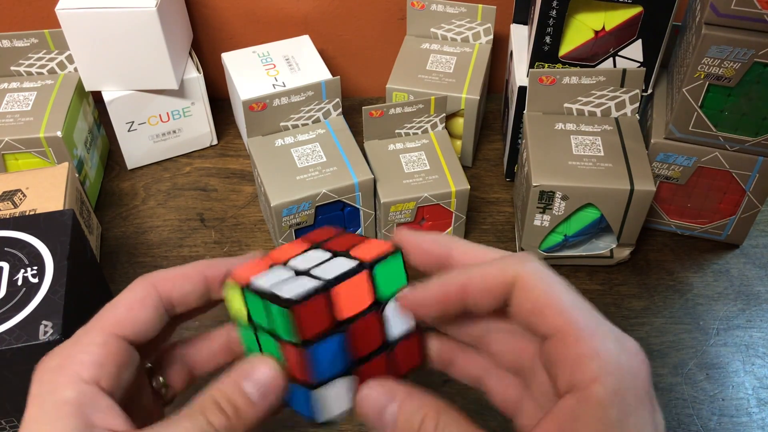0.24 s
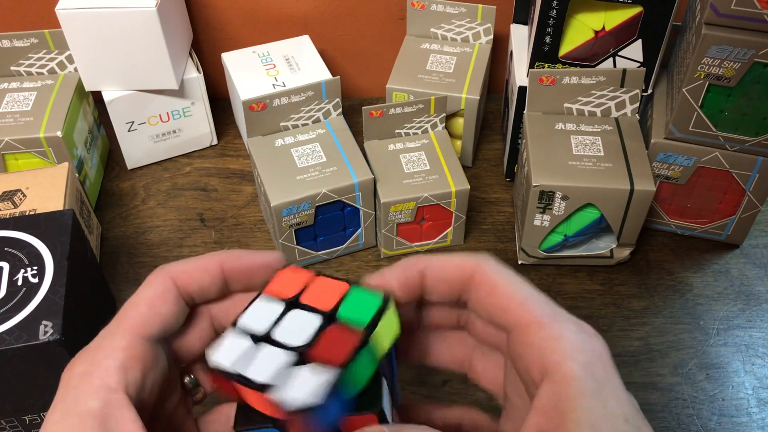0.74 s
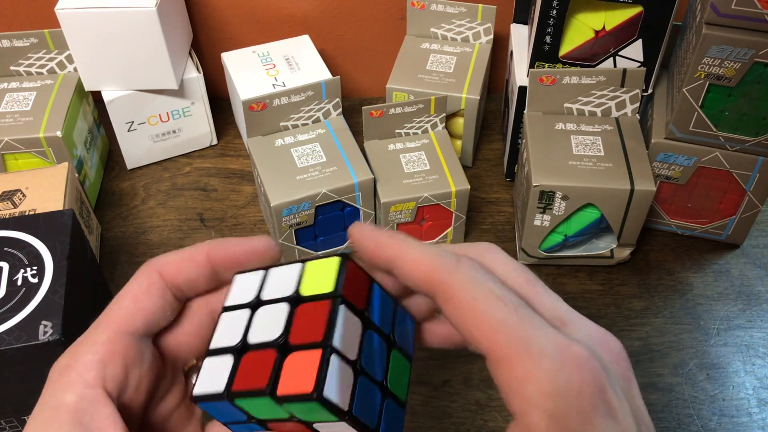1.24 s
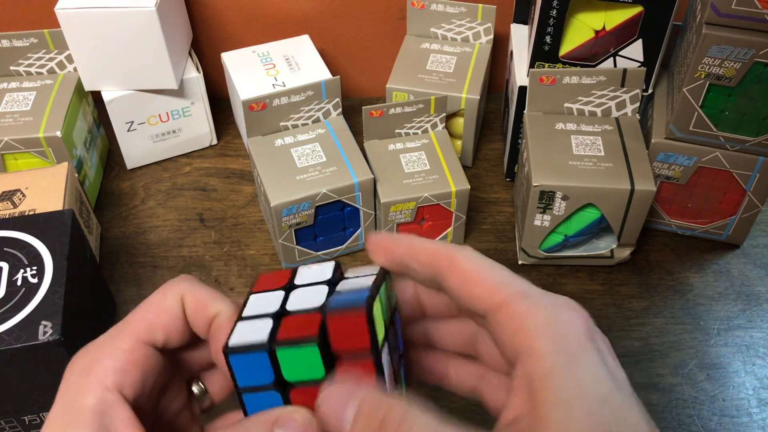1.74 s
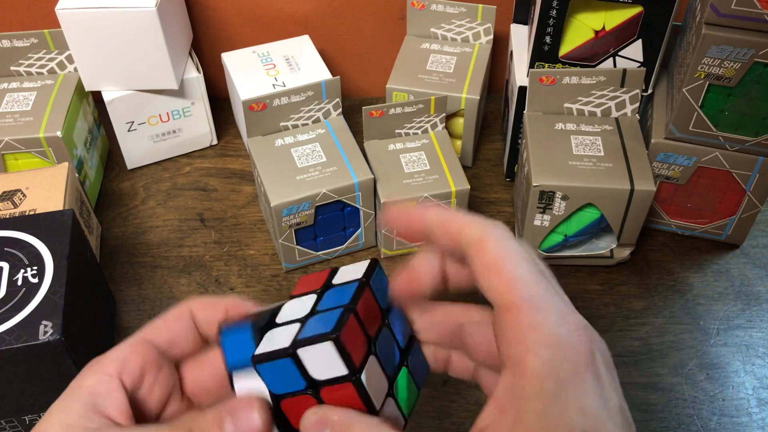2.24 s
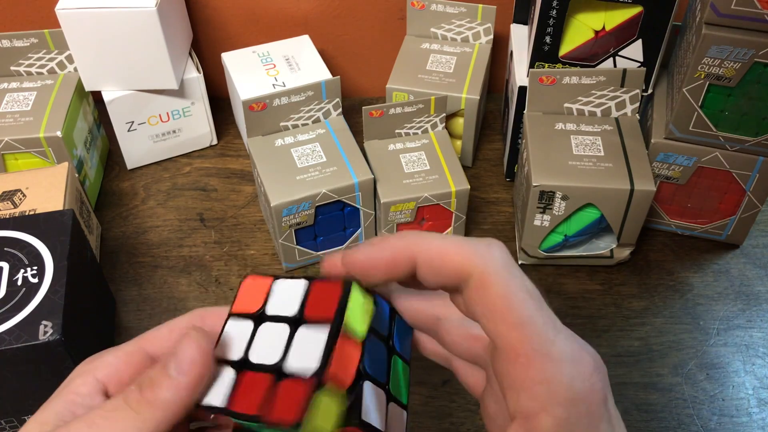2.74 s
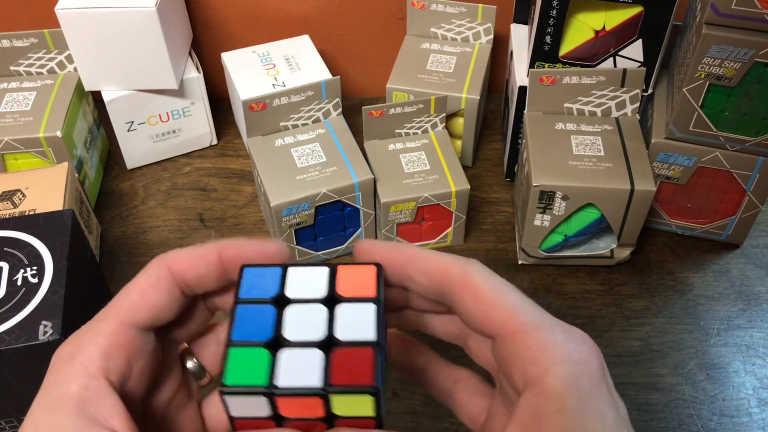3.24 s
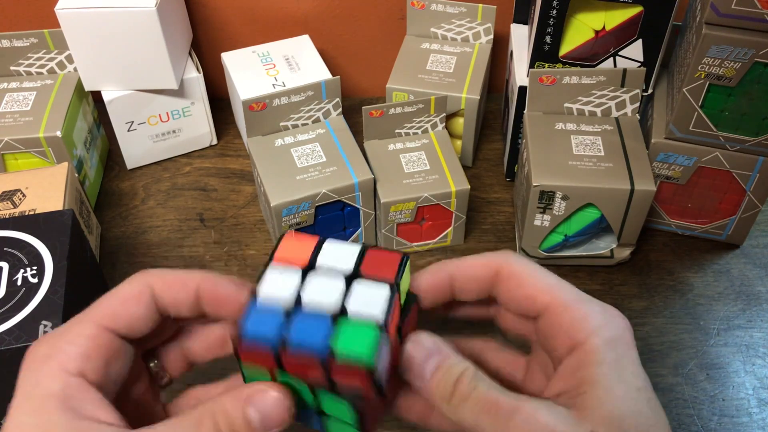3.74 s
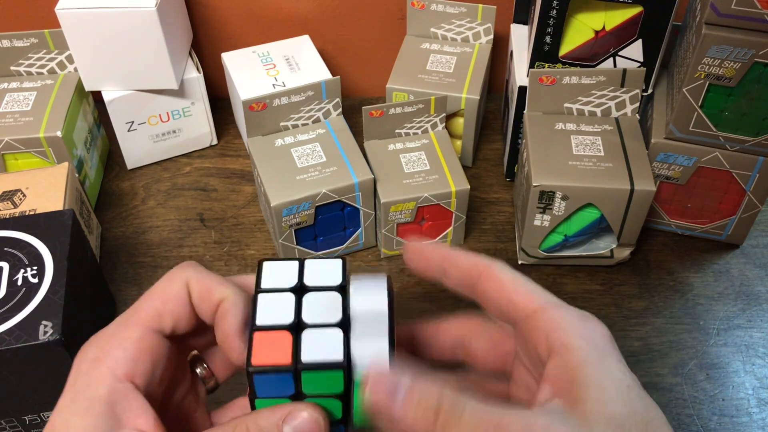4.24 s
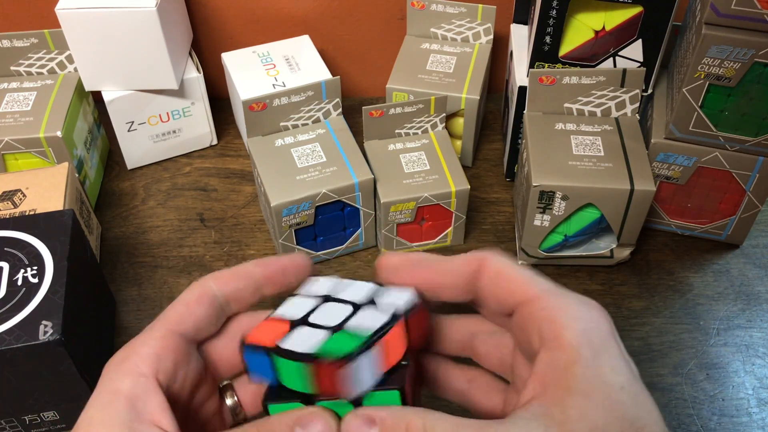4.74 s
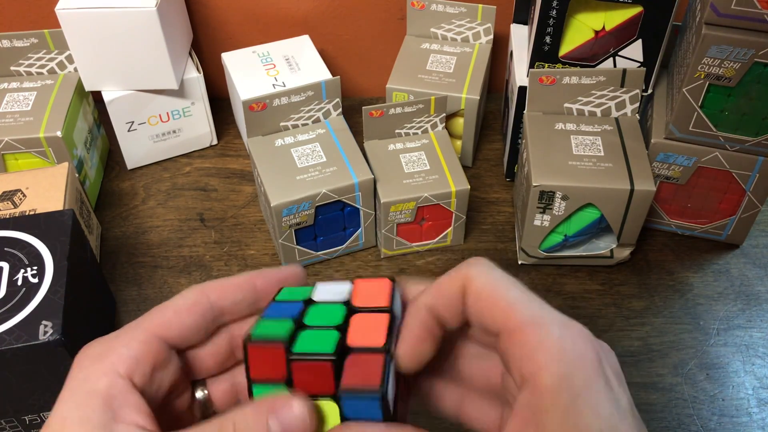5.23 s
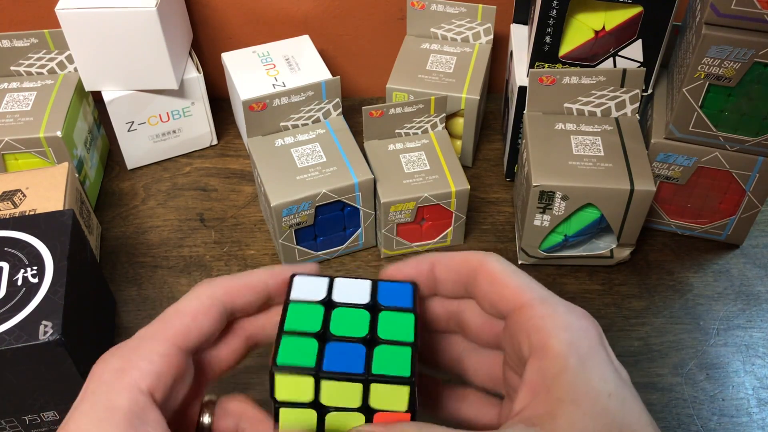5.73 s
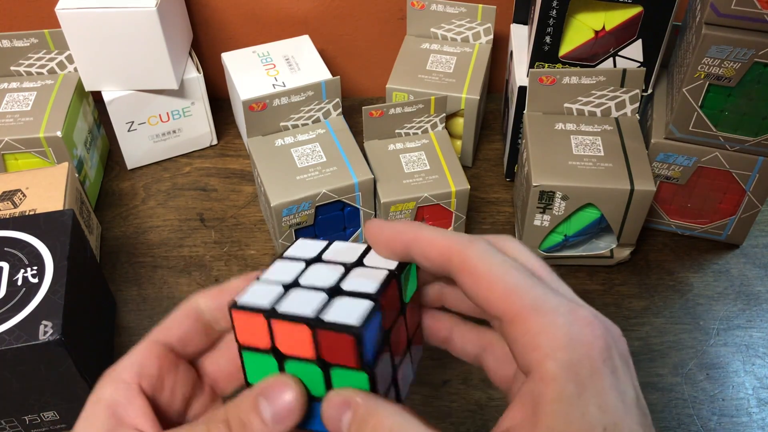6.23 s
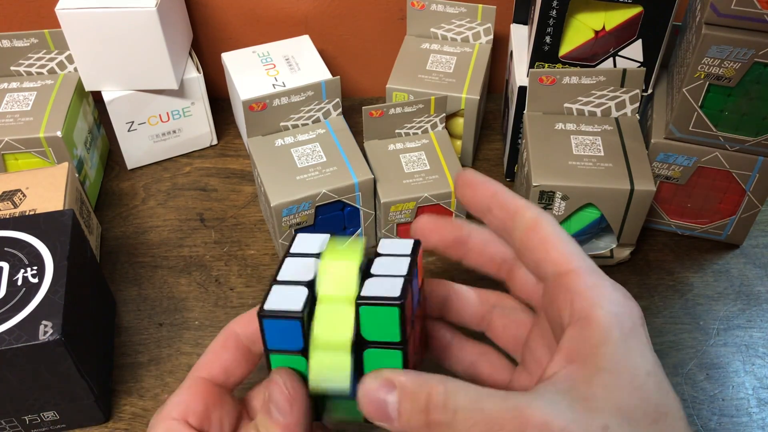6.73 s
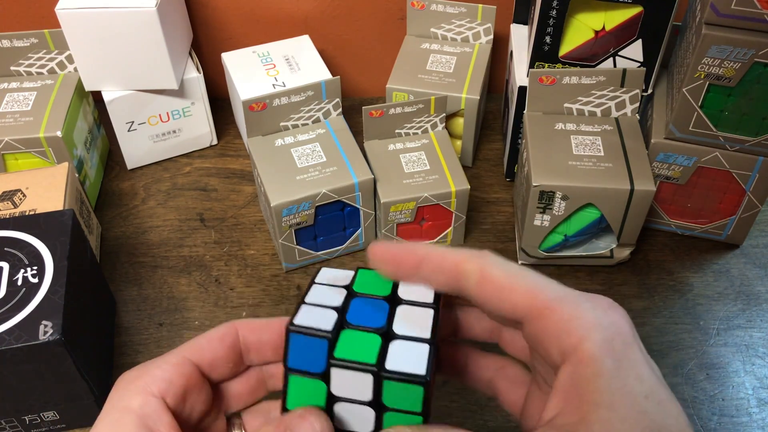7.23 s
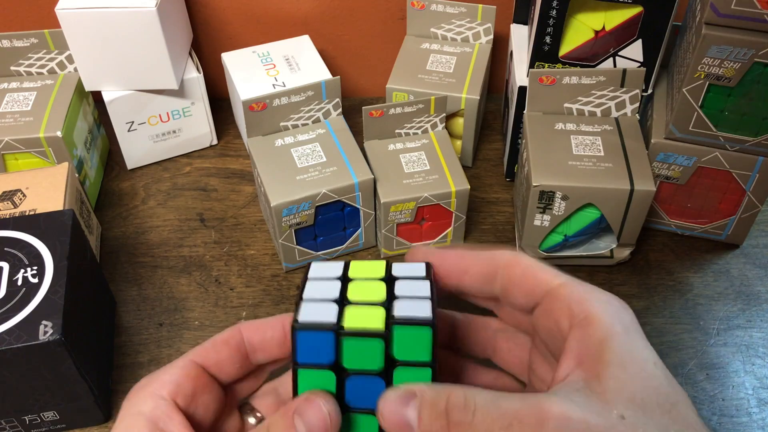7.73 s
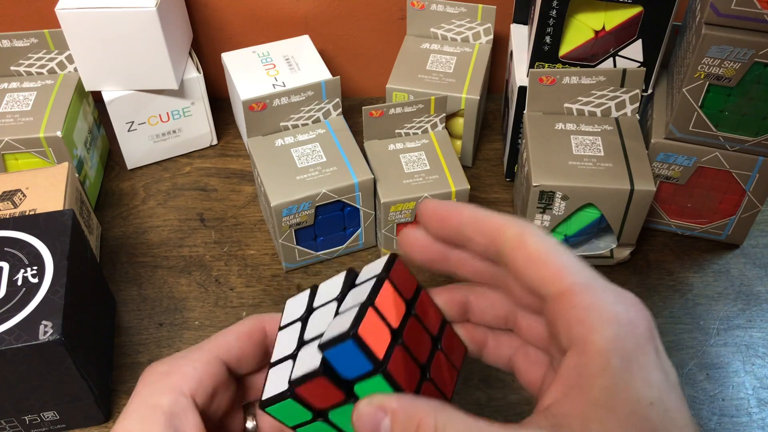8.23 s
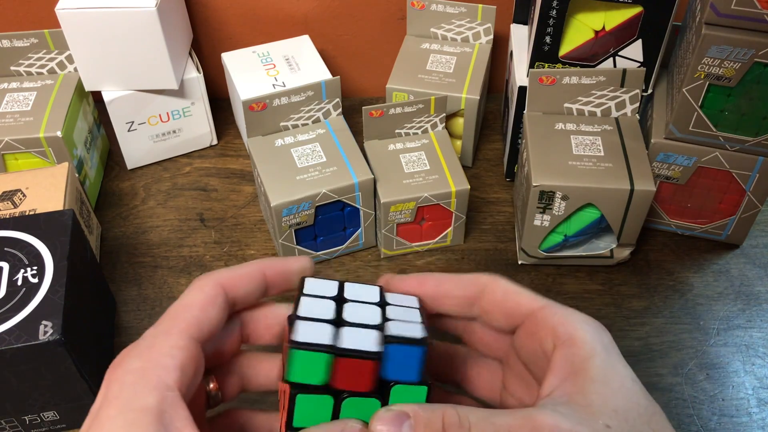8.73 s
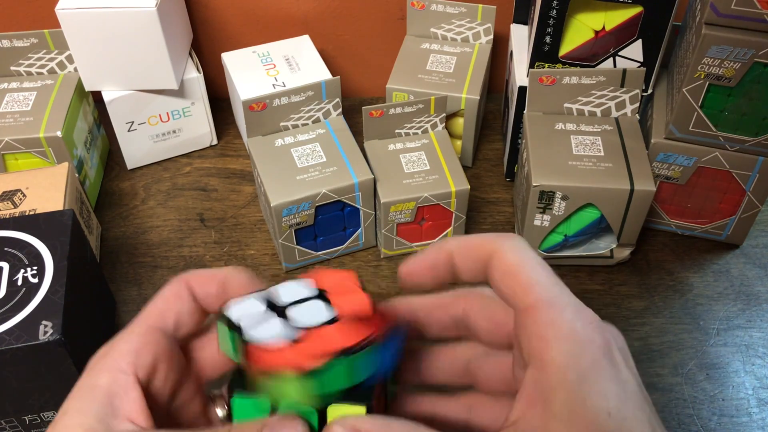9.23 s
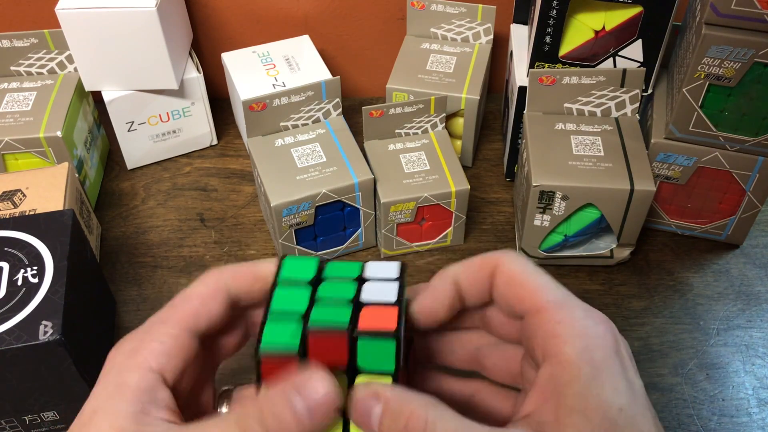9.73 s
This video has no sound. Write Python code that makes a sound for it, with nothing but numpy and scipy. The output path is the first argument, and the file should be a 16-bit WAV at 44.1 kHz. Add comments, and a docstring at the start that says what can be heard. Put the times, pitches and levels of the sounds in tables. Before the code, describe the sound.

Close to the microphone, hands twist a hollow plastic puzzle cube. Layers slide with dry scratchy rattles that end in sharp clacks, grouped in irregular flurries with brief regrips and soft finger brushes between. It starts fairly lightly, thins out in the middle, then grows denser and harder towards the end. A small reflective room adds a short tail, over a faint low hum.

```python
"""In a small, fairly live room, a plastic speed cube is turned in quick flurries above a desk.
Each turn is a run of tiny ticks that slide, rattle and get harder as the pieces mesh; then the fingers regrip.
Pieces land with clacks: a few tiny contacts that crack in the thin shells and knock in the cavities.
Fingertips brush the faces with a fine hiss, and the cube gives dull bumps made of low noise.
The room adds a dense tail of fading noise; under it all lie a low, wavering hum and faint room noise."""
import sys
import numpy as np
from scipy import signal
from scipy.fft import rfft, irfft
from scipy.io import wavfile
from scipy.ndimage import uniform_filter1d

SR = 44100
rng = np.random.default_rng(int(sys.argv[2]) if len(sys.argv) > 2 else 0)


def put_to_file(sound):
    """Save the sound as 16-bit audio at rate SR, in the file named by the first command-line argument."""
    columns = np.atleast_2d(sound).T  # one column per channel
    safe = np.clip(columns, -1, 1)
    whole_steps = np.round(safe * 32767)
    wavfile.write(sys.argv[1], SR, whole_steps.astype(np.int16))


N = 439677  # length in samples


def undb(db):
    """Turn decibels into a gain."""
    return 10 ** (np.asarray(db) / 20)


def unit(x):
    """Scale to an energy of one."""
    return x / np.sqrt(np.sum(x ** 2) + 1e-18)


def level(x, db):
    """Scale to an average (rms) level in dB."""
    return unit(x) * np.sqrt(len(x)) * undb(db)


def add(out, s, x):
    """Mix x into out at time s."""
    i = max(0, int(s * SR))
    out[i:i + len(x)] += x[:max(0, len(out) - i)]


def fade(t, t60):
    """Die away freely, by 60 dB in t60 seconds."""
    return np.exp(-np.log(1000) * t / t60)


def spectrum(points, size):
    """Draw a smooth dB curve through (pitch_hz, level_db) points, over the bins of a transform."""
    hz, db = np.transpose(points)
    return np.interp(np.log(np.fft.rfftfreq(size, 1 / SR) + 1), np.log(hz), db)


def walk(rate):
    """Wander at random with an rms of one, heading for a new value about rate times per second."""
    k = int(SR / rate)
    steps = np.repeat(rng.standard_normal(N // k + 1), k)
    return level(uniform_filter1d(steps, k)[:N], 0)


LEAD_S = 0.005  # pieces graze this long before they snap home


def contacts(edge_db=0, graze=1, chatter_t60=0.032, snap_t60=0.0034, snap_db=-2.0,
             graze_t60=0.013, vary=0.15, crispen=0.4, size=1024):
    """Pieces graze, the main contact snaps, then loose neighbours chatter; an edge snaps more cleanly."""
    t = np.arange(size) / SR - LEAD_S
    before, after = np.maximum(-t, 0), np.maximum(t, 0)
    snap, chatter = rng.standard_normal((2, size))
    touching = rng.random(size) < 0.2  # loose pieces touch only now and then
    slack, force = np.exp(vary * rng.standard_normal(2))
    crisp = undb(crispen * edge_db)
    grazing = fade(before, graze * graze_t60 / crisp)
    settling = fade(after, chatter_t60 * slack / crisp)
    loose = unit(chatter * touching * grazing * settling)
    main = unit(snap * (t >= 0) * fade(after, snap_t60))
    return loose + main * force * crisp * undb(snap_db)


# crack of the thin shells, before it is tilted brighter or duller: pitch_hz [Hz], level_db [dB]
SHELL_CRACK = [(100, -25), (350, -26.5), (800, -16.5), (2000, -7.5), (2800, -4.5), (3900, -1), (5000, 1),
               (7200, -1), (9000, -3), (11000, -6.5), (15000, -14)]


def shell(bright_db, hinge_hz=6800, size=256):
    """A contact cracks in the thin shells; a brighter one lifts the treble and lowers the rest."""
    hz = np.fft.rfftfreq(size, 1 / SR)
    tilt = np.tanh(2.1 * np.log((hz + 1) / hinge_hz))
    db = spectrum(SHELL_CRACK, size) + 0.39 * bright_db * tilt
    # minimum phase: the sound starts at once and rings afterwards
    cepstrum = irfft(np.log(undb(db)))
    cepstrum[1:size // 2] *= 2
    cepstrum[size // 2 + 1:] = 0
    return irfft(np.exp(rfft(cepstrum)))


# ringing air and walls of the hollow pieces, before random spread:
# pitch_hz [Hz], t60_s (time to fade by 60 dB) [s], level_db [dB]
HOLLOW_RINGS = [(1248, 0.046, -3), (1324, 0.027, 2.5), (1437, 0.021, -3.5), (1595, 0.047, -2.5),
                (1825, 0.0092, -2), (2100, 0.018, -4.5), (353, 0.031, -16.5), (560, 0.024, -16.5)]
# moments when a firm grip raises the pitch of the cavities: peak_s [s], rise_semitones [semitones]
GRIP_SQUEEZES = [(1.79, 1.35), (2.46, 0.6), (7.011, 4.06), (9.3, 1.15)]
SQUEEZE_S = 0.074  # the rise falls to about a third this long before and after its peak


def hollow(s, force_db, scatter_db=2.5, detune=0.035, stiffen=0.21, build_s=0.00027, size=2048):
    """Hollow pieces knock at time s; the grip shifts their pitch, and hard blows favour the upper rings."""
    hz, t60, db = np.transpose(HOLLOW_RINGS)[:, :, None]
    t = np.arange(size) / SR
    shift, weight, side = rng.standard_normal((3, len(HOLLOW_RINGS), 1))
    upper = np.clip(np.log2(hz / 1450) * 4, -1, 1)
    gain = undb(db + scatter_db * weight + stiffen * force_db * upper) * np.sign(side)
    semitones = sum(rise * np.exp(-((s - peak) / SQUEEZE_S) ** 2) for peak, rise in GRIP_SQUEEZES)
    pitch_hz = hz * 2 ** (semitones / 12) * (1 + detune * shift)
    ring = np.sum(gain * fade(t, t60) * np.sin(2 * np.pi * pitch_hz * t), axis=0)
    return ring * (1 - np.exp(-t / build_s))


KNOCK_DB = -9.5  # knock of a blow with edge_db 0, against its crack
RESTING_GRAZE = 0.2  # share of the graze time that is left when no layer is moving
# pieces striking each other: start_s [s], crack_db (averaged over about 1 ms) [dB],
# edge_db (above 0 a sharp edge ticks, below 0 a flat face knocks) [dB]
LANDINGS = [(0.036, -38, 4), (0.1826, -24.5, -5.5), (0.332, -39.5, 10), (0.545, -37.5, 0),
            (0.6913, -30, -13), (0.748, -29, -7), (0.7965, -25.5, -2), (0.827, -19.5, -0.5),
            (1.433, -43, 10), (1.451, -28.5, -3), (1.4987, -21.5, -5.5), (1.5809, -7, 9), (1.657, -20.5, 2),
            (1.6654, -18.5, -1.5), (1.7535, -18.5, -4), (1.776, -23, -11), (1.9306, -37.5, 7),
            (2.0142, -28.5, -3), (2.0693, -11.5, 23), (2.0731, -16.5, -5.5), (2.0886, -11.5, 1),
            (2.103, -18, 4), (2.1703, -19, -0.5), (2.254, -17.5, -5.5), (2.282, -21, -7.5),
            (2.4175, -23, -1), (2.4471, -20.5, 3), (2.5128, -16.5, -4), (2.8093, -30, -7), (2.866, -36, -5),
            (3.0122, -34, -11.5), (3.0328, -24.5, -5.5), (3.381, -29.5, -5), (3.4113, -20.5, -9),
            (3.557, -31, -7), (3.6656, -23.5, -2), (3.6959, -23.5, -3.5), (3.8385, -24.5, -8.5),
            (3.941, -38, -5), (4.059, -27, -10), (4.0897, -24.5, -9), (4.225, -31, -7), (4.28, -24.5, -6),
            (4.309, -17.5, -2), (4.3237, -30, 2), (4.5206, -38.5, -3), (4.587, -38, 13),
            (4.8006, -24.5, -2), (4.8363, -18, 2.5), (4.8519, -28.5, -7), (4.923, -30.5, -5.5),
            (4.941, -37, 7), (5.145, -25, -2), (5.215, -29, -2), (5.2596, -10.5, 1), (5.2794, -12.5, -1),
            (5.347, -18.5, -1.5), (5.4218, -27.5, -2), (5.4662, -17, 7), (5.4739, -14.5, -5),
            (5.6672, -17.5, -4.5), (5.821, -22.5, -6.5), (5.8483, -11, 5), (5.881, -17.5, 5),
            (5.9939, -8.5, 8), (5.9983, -10.5, -3), (6.0473, -19, 6), (6.174, -34, 0), (6.259, -42, -8),
            (6.2943, -41.5, 23), (6.469, -44, 2), (6.534, -24.5, -10), (6.5549, -16.5, 0),
            (6.679, -24, -6.5), (6.712, -18.5, -3.5), (6.772, -17.5, 8), (6.7969, -11, 0),
            (6.8903, -18.5, 15), (6.9574, -25.5, -11.5), (6.9804, -16, 4), (7.0175, -16.5, 5),
            (7.032, -16, 1), (7.052, -21, 14), (7.073, -12.5, 25), (7.1951, -27, -4.5), (7.2617, -27.5, 0),
            (7.5059, -26, -8), (7.5442, -6, 0.5), (7.557, -11.5, 6), (7.706, -32, 7), (7.8148, -17, 7),
            (7.8341, -11, 5), (7.8495, -19, -7), (7.9004, -10.5, 7.5), (7.9644, -13, 1), (7.976, -15.5, 2),
            (8.0277, -10.5, 3), (8.034, -10.5, 1), (8.0425, -10, 1), (8.16, -29, -1), (8.3916, -27, -4),
            (8.5324, -35.5, -6), (8.8507, -17, -1), (9.0708, -20, -3), (9.1178, -17.5, -6),
            (9.1345, -17.5, -5), (9.1544, -18, -8), (9.2797, -10.5, 6), (9.2978, -8, 11),
            (9.3015, -0.5, 3.5), (9.3793, -9, 2), (9.4917, -26, -12.5), (9.5283, -17.5, -3.5),
            (9.6901, -21, -3), (9.777, -14, 6.5), (9.9002, -34, -3), (9.9606, -33.5, -4)]


def clacks(firm_db=-25, colour_db=7.0):
    """Each landing cracks in the shells and knocks in the cavities; an edge is brighter and knocks less."""
    out = np.zeros(N)
    for s, db, edge_db in LANDINGS:
        bright_db = edge_db + colour_db * rng.standard_normal()
        knock_db = db + KNOCK_DB - edge_db
        moving = any(start + LEAD_S < s < end + LEAD_S for start, end, *_ in LAYER_TURNS)
        touch = contacts(edge_db, 1 if moving else RESTING_GRAZE)
        crack = signal.fftconvolve(touch, shell(bright_db))
        knock = hollow(s, knock_db - firm_db)
        add(out, s - LEAD_S, unit(crack) * undb(db))
        add(out, s, unit(knock) * undb(knock_db))
    return out * np.sqrt(SR // 1000)  # energy of one spread over about 1 ms


MESH_S = 0.0097  # how sharply the mesh sets in: a third of its rise this long before the end
BITE_S = 0.0028  # the first push only rattles; the scrape bites as the layer gathers speed


def sliding(start, end, db, rate, mesh_db, bright_db, spread_db=6.5, scrape_db=-2.5, rattle_db=-6.0,
            firm_db=-36, harden=0.37, count=4, size=256):
    """A layer catches and slips in tiny ticks; light strokes rattle the cavities, hard ones scrape."""
    length = end - start
    when, hardness, side = rng.random((size, 3))[:count + int(rate * length)].T
    times = length * when
    effort_db = mesh_db * np.exp((times - length) / MESH_S)
    chance_db = spread_db * np.minimum(-np.log(1 - hardness), 3)
    strength = undb(chance_db + effort_db) * np.sign(side - 0.5)
    # several pieces share the ticks, each with its own chatter
    ticks = np.zeros((count, int(length * SR) + 1))
    ticks[np.arange(len(times)) % count, (times * SR).astype(int)] = strength
    touches = sum(signal.fftconvolve(piece, contacts()) for piece in ticks)
    scrape = signal.fftconvolve(touches, shell(bright_db))[int(LEAD_S * SR):]
    scrape = scrape * (1 - np.exp(-np.arange(len(scrape)) / SR / BITE_S))
    middle = (start + end) / 2
    rattle = sum(signal.fftconvolve(piece, hollow(middle, db - firm_db)) for piece in ticks)
    out = undb(rattle_db - harden * max(db - firm_db, 0)) * unit(rattle)
    add(out, 0, undb(scrape_db) * unit(scrape))
    return out * undb(db) * np.sqrt(length * SR)


SLIDE_RATE = 430  # ticks per s while a layer turns, plus a few
MESH_DB = 11  # the ticks get this much stronger by the end of a turn
REGRIP_S = (0.087, 0.35)  # the regrip starts and ends this long after the turn
REGRIP_DB, REGRIP_MAX_DB = -24.5, -61  # regrip setting: dB against the turn, and its highest value
REGRIP_RATE, REGRIP_BRIGHT_DB = 160, 9.0  # light ticks per s, plus a few, and their brightness setting
# turns of a layer: start_s [s], end_s [s], level_db (before the scrape and rattle shares) [dB],
# brightness_db (setting for the shell's tilt) [dB]
LAYER_TURNS = [(0.113, 0.185, -36.5, -1), (0.492, 0.6, -62.5, -0.5), (0.65, 0.831, -41.5, 4),
               (0.874, 0.991, -44.5, 7), (1.453, 1.584, -38, -4), (1.599, 1.785, -40, 9),
               (1.899, 1.999, -48, -1), (2.011, 2.107, -37.5, -1), (2.124, 2.198, -41, 5),
               (2.249, 2.332, -42, 3), (2.432, 2.469, -27.5, 7), (2.592, 2.699, -48.5, -22),
               (2.796, 2.898, -46, -14), (2.954, 3.04, -45.5, 15), (3.348, 3.42, -46, 10),
               (3.642, 3.7, -41, -6), (3.997, 4.103, -43.5, 5), (4.109, 4.324, -46.5, 14),
               (4.777, 4.858, -39, 3), (5.098, 5.269, -36.5, 2), (5.46, 5.482, -16, 10),
               (5.618, 5.669, -40.5, 5), (5.85, 6.003, -34.5, 2), (6.503, 6.559, -36.5, 14),
               (6.682, 6.81, -33.5, 5), (6.839, 7.076, -39, 2), (7.492, 7.558, -32, 8),
               (7.791, 7.907, -37.5, 20), (7.944, 8.042, -28.5, 1), (8.776, 8.864, -42, 5),
               (9.115, 9.17, -30.5, 8), (9.21, 9.306, -27, 2.5), (9.499, 9.649, -35.5, -3),
               (9.677, 9.783, -31, 5)]


def turns():
    """Each turn slides until its pieces mesh; then loose layers stir faintly as the fingers regrip."""
    out = np.zeros(N)
    for start, end, db, bright_db in LAYER_TURNS:
        add(out, start, sliding(start, end, db, SLIDE_RATE, MESH_DB, bright_db))
        release, grip = end + np.array(REGRIP_S)
        regrip_db = min(db + REGRIP_DB, REGRIP_MAX_DB)
        add(out, release, sliding(release, grip, regrip_db, REGRIP_RATE, 0, REGRIP_BRIGHT_DB))
    return out


# tone of skin on smooth plastic, shape only: pitch_hz [Hz], level_db [dB]
SKIN_TONE = [(300, -33), (2000, -6), (6000, -6), (9500, 1), (12000, -4), (15500, -8)]
# fingertips brushing over the faces: start_s [s], end_s [s], level_db (mid-stroke, before the catches) [dB]
FINGER_BRUSHES = [(0.962, 1.055, -49), (1.848, 2.006, -60), (2.577, 2.734, -49.5), (2.79, 2.94, -47.5),
                  (2.943, 2.98, -46.5), (3.413, 3.474, -47), (3.88, 4.014, -60), (4.055, 4.23, -47),
                  (8.197, 8.29, -52.5), (7.33, 7.405, -64)]


def brushes(catch_db=3.0, catch_rate=150):
    """Skin brushes a face: a fine hiss that swells, catches unevenly and fades."""
    strokes = np.zeros(N)
    noise = irfft(rfft(rng.standard_normal(N)) * undb(spectrum(SKIN_TONE, N)), N)
    hiss = level(noise, 0) * undb(catch_db * walk(catch_rate))
    for start, end, db in FINGER_BRUSHES:
        swell = np.sin(np.linspace(0, np.pi, int((end - start) * SR)))
        add(strokes, start, undb(db) * swell)
    return strokes * hiss


# dull bumps of the cube in the hands: start_s [s], level_db (before it fades) [dB],
# t60_s (time to fade by 60 dB) [s], top_hz (upper edge of the rumble) [Hz]
HAND_BUMPS = [(6.888, -36.5, 0.45, 137), (9.301, -36.5, 0.1, 330)]


def bumps(low_hz=60):
    """A soft bump sets off a short low rumble of filtered noise."""
    out, t = np.zeros(N), np.arange(SR // 2) / SR
    for s, db, t60, top_hz in HAND_BUMPS:
        band = signal.butter(2, [low_hz, top_hz], "band", fs=SR, output="sos")
        rumble = signal.sosfilt(band, rng.standard_normal(len(t)))
        add(out, s, level(rumble, db) * fade(t, t60))
    return out


# reverberation by pitch: pitch_hz [Hz], t60_s (time to fade by 60 dB) [s], level_db [dB]
ROOM_TAIL = [(150, 0.59, 0.5), (467, 0.46, 3), (790, 0.43, 8.5), (1290, 0.49, -6), (2030, .38, 3),
             (5030, 0.34, -6), (8350, 0.3, -3), (15200, 0.17, -6)]


def room(x, gap_s=0.002, build_s=0.0069, size=32768):
    """Boxes and walls return a dense tail of fading noise; the highest treble dies first."""
    t, hz = np.arange(size) / SR, np.fft.rfftfreq(size, 1 / SR)
    noise, response = rfft(rng.standard_normal(size)), 0
    centres = np.log([row[0] for row in ROOM_TAIL])
    for band, (_, t60, db) in zip(np.eye(len(ROOM_TAIL)), ROOM_TAIL):
        share = np.interp(np.log(hz + 1), centres, band)  # neighbouring bands blend into each other
        envelope = unit(fade(t, t60) * np.clip((t - gap_s) / build_s, 0, 1))
        response = response + undb(db) * envelope * irfft(noise * share)
    return signal.oaconvolve(x, response)[:N]


AIR_DB = -54  # level of the whole room noise
# tone of the room noise, shape only: pitch_hz [Hz], level_db [dB per Hz]
AIR_TONE = [(25, 2.5), (90, -9), (160, -8), (250, -14.5), (400, -16.5), (700, -22), (1300, -25.5),
            (5000, -31), (15000, -34)]
# lower and upper hum, before the swell: pitch_hz [Hz], level_db [dB]
HUM_TONES = [(70, -65), (102, -61)]
# the upper hum swells and sinks: time_s [s], change_db [dB]
UPPER_HUM_SWELL = [(0, 3), (0.9, -2), (1.2, -2.5), (2.0, -4.5), (2.5, 4), (3.0, 0), (3.7, 4.5), (4.4, -3),
                   (5.0, -5), (5.7, 4), (6.3, 1), (7.5, 0), (8.7, -4.5), (9.9, -2)]


def background(waver_db=3.5, drift=0.84):
    """Steady noise fills the room over two low sine hums that waver in level and phase."""
    t = np.arange(N) / SR
    air = irfft(rfft(rng.standard_normal(N)) * undb(spectrum(AIR_TONE, N)), N)
    hums = []
    for hz, db in HUM_TONES:
        tone = np.sin(2 * np.pi * hz * t + drift * walk(14))
        hums.append(level(tone * undb(waver_db * walk(9.3)), db))
    lower, upper = hums
    swell_db = np.interp(t, *np.transpose(UPPER_HUM_SWELL))
    return level(air, AIR_DB) + lower + upper * undb(swell_db)


def scene(count=3):
    """The cube radiates a different pattern each way: one reaches the microphone, all excite the room."""
    skin = brushes()
    directions = [clacks() + turns() + skin for _ in range(count)]
    tail = sum(room(sound) for sound in directions) / np.sqrt(count)
    return (directions[0] + tail + bumps() + background())[None]


TOP_HZ = 15700  # highest pitch that gets through


def record(dry):
    """Peaks beyond full scale clip; then the top is cut steeply."""
    top_cut = signal.ellip(8, 0.2, 70, TOP_HZ, fs=SR, output="sos")
    return signal.sosfilt(top_cut, np.clip(dry, -1, 1))


dry = scene()
out = record(dry)
put_to_file(out)
```